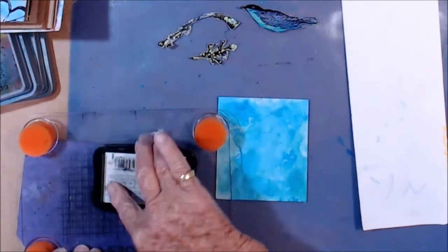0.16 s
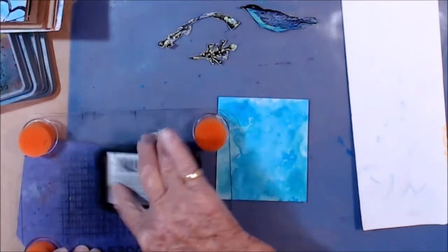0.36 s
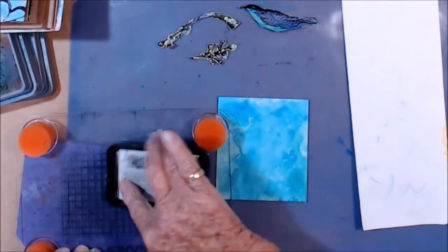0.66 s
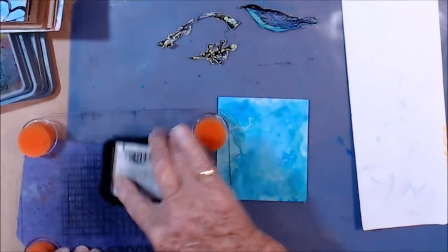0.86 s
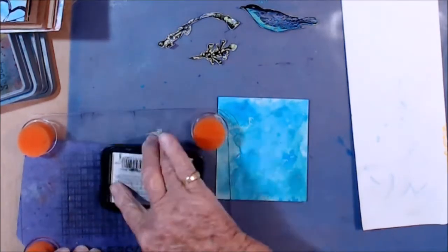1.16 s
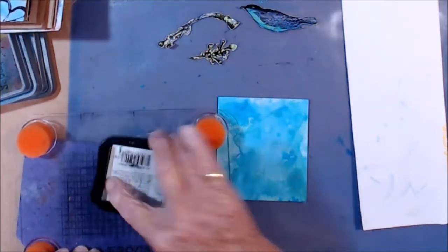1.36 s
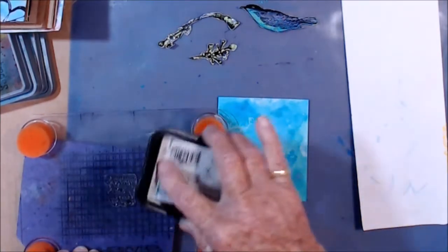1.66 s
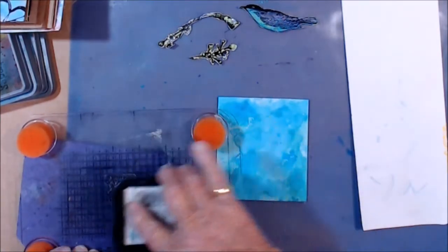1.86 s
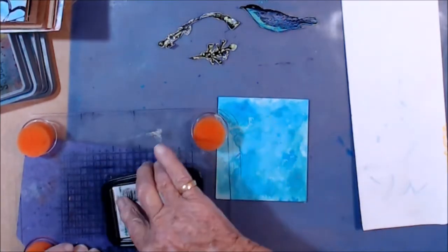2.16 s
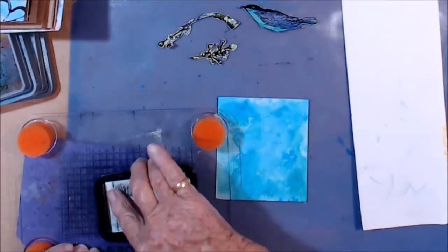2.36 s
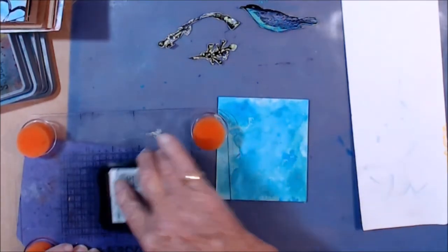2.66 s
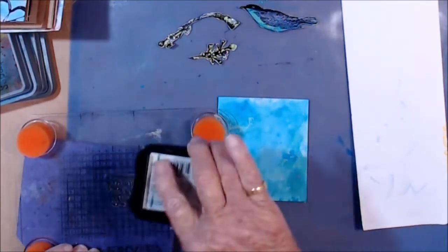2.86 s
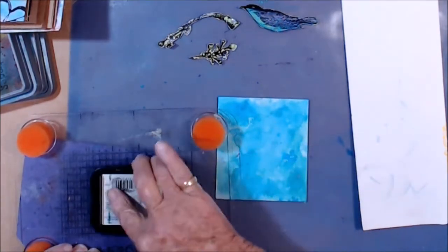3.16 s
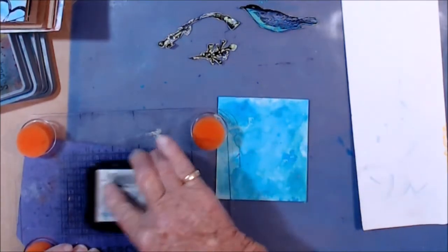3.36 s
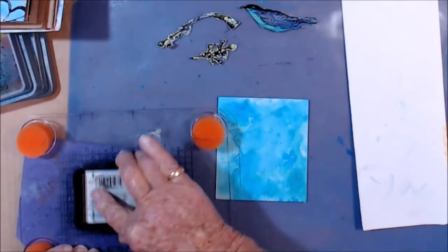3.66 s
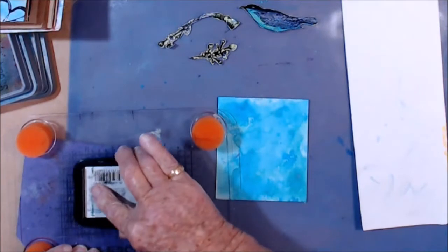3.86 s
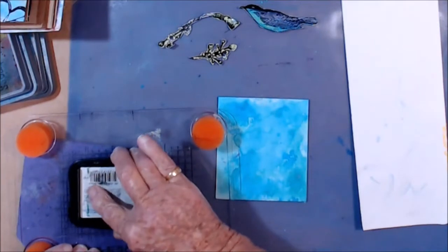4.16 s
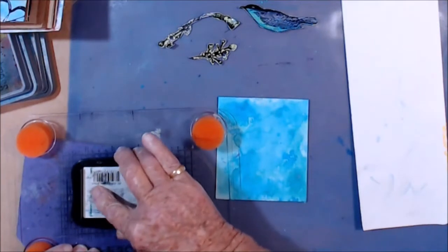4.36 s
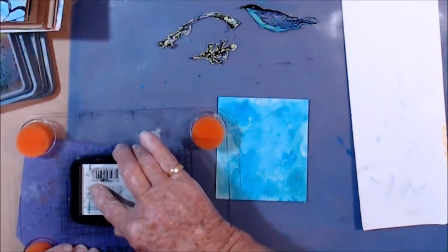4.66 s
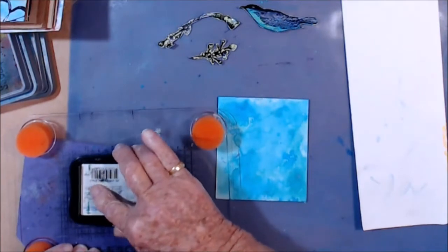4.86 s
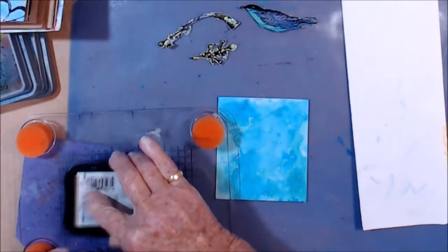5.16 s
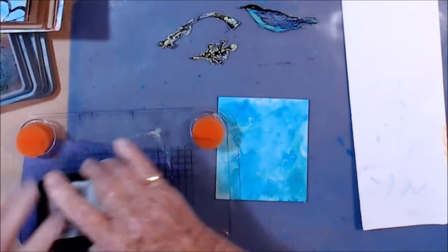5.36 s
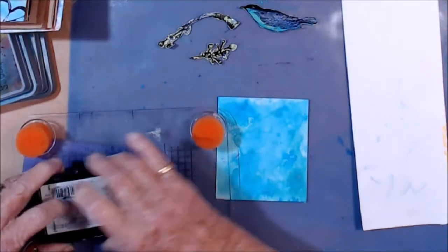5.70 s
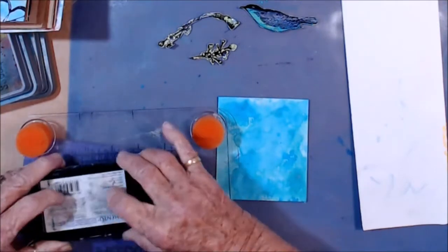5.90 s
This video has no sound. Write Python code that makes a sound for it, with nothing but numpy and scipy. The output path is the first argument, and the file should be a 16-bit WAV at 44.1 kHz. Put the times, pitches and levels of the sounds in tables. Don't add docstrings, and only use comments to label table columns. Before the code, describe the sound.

An ink pad is pressed repeatedly onto a rubber stamp, giving dull, thumping plastic taps on a table at an uneven pace indoors.

```python
import sys
import numpy as np
from scipy import signal
from scipy.io import wavfile
from scipy.ndimage import uniform_filter1d

SR = 44100
rng = np.random.default_rng(int(sys.argv[2]) if len(sys.argv) > 2 else 0)


def makeup_ratio(level_db):
    decades = np.asarray(level_db, float) / 20
    return 10 ** decades


def store_wav(level_fs):
    pcm = np.round(np.clip(np.atleast_2d(level_fs), -1, 1) * 32767)
    wavfile.write(sys.argv[1], SR, pcm.T.astype(np.int16))


N = 266011

# (deepest swing [s], table top [dB], legs [dB], stamp block [dB],
# pad lifts after [ms])
THUMPS = [(0.036, -21.5, -27, -36.5, 62), (0.369, -19.5, -27.5, -31.5, 39),
          (0.6456, -17.5, -30.5, -29.5, 45), (1.1082, -20, -27, -35, 56), (2, -30, -33.5, -48.5, 89),
          (2.283, -22, -30.5, -34, 49), (2.486, -34, -39, -56.5, 55), (3.1149, -18.5, -21, -23.5, 43),
          (3.4394, -21, -15.5, -17.5, 110), (3.71, -15, -20, -19, 110), (3.926, -19, -22, -23, 44),
          (4.28, -19.5, -22, -20.5, 110), (4.4612, -25, -42, -37.5, 47), (4.6403, -22, -37.5, -39.5, 50),
          (4.9652, -28.5, -32, -38, 49)]
# (time [s], table top [dB], legs [dB], stamp block [dB], block pitch [ratio])
NUDGES = [(0.3, -60, -55, -72, 0.81), (0.43, -51.5, -55, -46, 0.91), (1.27, -51, -51, -70, 0.61),
          (1.55, -62, -59, -82, .95), (2.02, -44, -59, -44.5, 0.99), (2.471, -55, -45, -64, 0.74),
          (2.818, -67, -60, -83, .91), (3.2, -40, -45, -40.5, .85), (3.33, -57, -50, -56, 0.76),
          (3.36, -60, -60, -59, .8), (3.535, -47, -34.5, -37, 0.76), (3.593, -51, -41, -37, 0.82),
          (3.625, -50, -52, -43, .9), (3.665, -53.5, -53, -47.5, 0.68), (3.787, -33, -55, -42, 0.72),
          (3.821, -49, -52.5, -44, 0.65), (4.005, -42, -52, -39, .68), (4.032, -50, -55, -45, .6),
          (4.051, -46, -54.5, -36, 0.76), (4.08, -54, -60, -46, .62), (4.14, -60, -61, -54, .7),
          (4.338, -38, -43, -36.5, 0.82), (4.632, -40, -29, -36.5, 0.93), (4.827, -70, -41, -87, 0.83),
          (4.9, -61, -43.5, -71, 0.83), (4.985, -34, -44, -54, 0.91), (5.134, -66, -48, -80, .9),
          (5.435, -61, -51, -67.5, 1), (5.641, -60.5, -71, -68, 0.91), (5.829, -74, -52.5, -82, 0.85),
          (5.925, -66, -50, -78, 0.89), (5.956, -64, -46, -78, .95), (6.016, -68, -46, -75, .95),
          (.55, -62, -50, -75, .7), (.215, -62, -54, -72, .6)]
# (frequency [Hz], likeness [0 to 1])
LIKENESS = [(30, 1), (300, 0.86), (1500, 0.12), (4000, 0.074), (12000, 0.12)]


def evened(x):
    return x / np.sqrt(np.mean(x ** 2) + 1e-20)


def read(points, hz):
    f, value = np.transpose(points)
    return np.interp(np.log(hz + 1), np.log(f + 1), value)


def add(mix, s, sound):
    part = mix[..., max(round(s * SR), 0):][..., :sound.shape[-1]]
    part += sound[..., :part.shape[-1]]


def ring(force, modes, pitch=1, hold=1):
    t = np.arange(SR // 9) / SR
    body = 0
    for hz, db, t60 in modes:
        body = body + makeup_ratio(db - 60 * t / (t60 * hold)) * np.sin(2 * np.pi * hz * pitch * t)
    out = signal.fftconvolve(force, body)
    return out / abs(out).max()


def noise(shape, patchy_db, size=1024):
    hop = size // 4
    hz = np.fft.rfftfreq(size, 1 / SR)
    a, b, c, d, patches = rng.standard_normal((N // hop + 5, len(hz), 5)).T
    patches = evened(uniform_filter1d(uniform_filter1d(patches, 8, 0), 8, 1))
    same = read(LIKENESS, hz)[:, None]
    left = a + 1j * b
    right = same * left + np.sqrt(1 - same ** 2) * (c + 1j * d)
    inside = (hz >= shape[0][0]) & (hz <= shape[-1][0])
    colour = makeup_ratio(read(shape, hz)[:, None] + patchy_db * patches) * inside[:, None]
    z = np.array([left, right]) * colour
    return evened(signal.istft(z, nperseg=size, noverlap=size - hop)[1][:, :N])


def shake(rest_db, share_db, fade_db):
    blows = np.zeros(N)
    for row in THUMPS + NUDGES:
        add(blows, row[0], makeup_ratio(np.array([row[3] + share_db])))
    fading = signal.lfilter([1], [1, -makeup_ratio(-fade_db / SR)], blows)
    return makeup_ratio(rest_db) + uniform_filter1d(fading, size=881)


def hands():
    # (time [s], grip
    # on the case [dB], sliding skin [dB])
    hand_moves = [(0, -98, -97.5), (.45, -86, -93), (.86, -88, -83), (1.05, -88, -89.5), (1.5, -85.5, -95),
                  (1.7, -103, -78), (1.95, -84, -87), (2.45, -79.5, -86), (2.9, -85, -98),
                  (3.5, -81.5, -90), (4.2, -92.5, -101), (4.72, -78, -79.5), (5.1, -77.5, -76.5),
                  (5.4, -76, -88), (5.58, -74, -77.5), (5.7, -72.5, -69), (6.03, -75, -81.5),
                  (2.23, -87, -87),
    ]
    # (frequency [Hz], level [dB per Hz])
    rumble = [(8.8, -48.5), (15, -1.5), (38, -5.5), (70, -1), (116, -13), (135, -25), (150, -19),
              (200, -63), (330, -120)]
    clatter = [(88, -42.5), (150, 10.5), (227, -2), (274, -12.5), (335, -22), (373, -20.5), (480, -24),
               (620, -46), (1060, -120)]
    handling = [(240, -37), (400, 1.5), (591, -4), (966, -8), (1290, -5.5), (1650, -11), (2500, -38),
                (3250, -59), (5500, -120)]
    rustle = [(880, -27.5), (1500, -4), (2340, -0.5), (2740, -5.5), (3140, -2), (4220, -4.5), (5040, -2.5),
              (6640, -12), (15800, -31.5)]
    hiss = [(88, -35), (150, 2.5), (236, -17.5), (304, -10), (477, -20), (548, -13.5), (3080, -29),
            (3970, -30), (6490, -32), (7740, -32.5), (8710, -45), (15100, -42), (16300, -45.5)]

    s, grip_db, slide_db = np.transpose(sorted(hand_moves))
    t = np.arange(N) / SR
    grip = makeup_ratio(np.interp(t, s, grip_db))
    slide = makeup_ratio(np.interp(t, s, slide_db))
    lumps = evened(uniform_filter1d(uniform_filter1d(rng.standard_normal(N), 500), 500))

    rumble_level = shake(rest_db=-63, share_db=-26, fade_db=210) + makeup_ratio(3.0) * grip
    clatter_level = shake(rest_db=-94, share_db=-12.5, fade_db=191) + makeup_ratio(-16.0) * grip
    case_level = shake(rest_db=-110, share_db=-40, fade_db=150) + grip
    skin_level = shake(rest_db=-110, share_db=-45.5, fade_db=152) + slide
    out = rumble_level * noise(rumble, patchy_db=4.0, size=4096)
    out += clatter_level * makeup_ratio(4.2 * lumps) * noise(clatter, patchy_db=5.0)
    out += case_level * makeup_ratio(0.5 * lumps) * noise(handling, patchy_db=-3.0)
    out += skin_level * noise(rustle, patchy_db=2.0, size=256)

    pulses = np.exp(2.9 * (np.cos(2 * np.pi * 29.97 * (t - .003)) - 1))
    whine = makeup_ratio(-90.5) * pulses * np.sin(2 * np.pi * 8000 * t)
    return out + makeup_ratio(-75.0) * noise(hiss, patchy_db=1.5) + whine


def drags():
    # (time [s], level [dB], lowest hollow [Hz], length [ms])
    strokes = [(0.861, -79.5, 530, 170), (1.36, -77, 400, 73), (1.63, -73, 476, 60), (1.782, -79, 470, 91),
               (3.5, -59, 413, 61), (3.57, -62.5, 405, 116), (3.765, -63, 450, 49), (3.99, -60.5, 427, 46),
               (4.035, -64, 439, 65), (4.11, -75.5, 430, 57), (4.3, -66.5, 520, 52), (1.139, -72, 458, 81),
               (0.4, -70, 542, 81), (0.329, -79, 417, 32), (3.17, -62, 428, 75), (4.66, -73, 657, 51),
               (5.119, -74.5, 504, 67), (5.32, -76, 577, 100), (5.399, -81, 1303, 98),
               (5.599, -75.5, 1050, 180), (5.381, -75.5, 515, 97), (5.469, -76.5, 578, 97),
               (5.558, -86, 420, 110), (5.629, -73.5, 542, 140), (5.739, -82, 530, 150),
               (5.819, -81.5, 456, 127)]
    # (pitch over the lowest [ratio], level [dB], width [Hz])
    hollows = [(0.983, 6, 115), (1.5, -2.5, 68), (2.4, -5.5, 100), (2.45, -7.5, 120)]
    out = np.zeros(N)
    ages = np.arange(2000) / SR
    for s, db, hz, length_ms in strokes:
        t = np.arange(round(length_ms * SR / 1000)) / SR
        body = 0
        for ratio, hollow_db, width in hollows:
            swell = ages * np.exp(-np.pi * width * ages)
            tone = np.sin(2 * np.pi * hz * ratio * ages)
            body = body + makeup_ratio(hollow_db) * width ** 1.7 * swell * tone
        friction = np.sin(np.pi * (t / t[-1]) ** 0.5) * rng.standard_normal(len(t))
        add(out, s, makeup_ratio(db) * evened(signal.fftconvolve(friction, body)))
    return out


def ticks():
    # (time [s], level [dB], brightest tone [Hz], ring to -60 dB [s])
    clicks = [(1.485, -53, 4030, 0.014), (3.1026, -29.5, 1936, 0.061), (3.43, -27, 2350, 0.007),
              (3.695, -20.5, 3740, 0.016), (4.2712, -29.5, 2500, 0.0067), (5.1125, -34, 2930, 0.0076),
              (5.2058, -25.5, 3040, 0.028), (5.2054, -32, 5100, 0.012), (5.2068, -55, 11000, .008),
              (6.2, -43, 5500, .008), (3.6953, -35, 11600, .012), (3.279, -34, 3740, 0.011),
              (6.1, -39.5, 5080, 0.026), (6.0054, -35, 3600, 0.032)]
    # (time [s], level [dB], length [ms])
    shivers = [
        (0.4544, -76, 26),
        (1.205, -80, 16.0),
        (2.3283, -78, 13),
        (2.381, -70.5, 19),
        (2.536, -79, 25),
        (3.17, -76, 20),
        (3.212, -77, 14),
        (3.4984, -68, 6.5),
        (3.54, -71, 6),
        (4.019, -74, 16.0),
    ]
    # (frequency [Hz], level [dB], ring to -60 dB [s])
    jar = [(4540, -3.5, 0.024), (5900, -11, 0.024)]
    out, t = np.zeros(N), np.arange(3000) / SR
    for s, db, hz, t60 in clicks:
        spread = 1.3 ** np.arange(-1, 5)
        modes = [(hz * r, -25 * abs(np.log(r)), t60 / r) for r in spread]
        add(out, s, makeup_ratio(db - 11.5) * ring(np.array([1., -1.]), modes))
    for s, db, length_ms in shivers:
        chatter = rng.standard_normal(3000) ** 3 * np.exp(-t * 1000 / length_ms)
        add(out, s, makeup_ratio(db + 5.0) * ring(chatter, jar))
    return out


def felt():
    # (time [s], level [dB], brightest tone [Hz], length [ms])
    peels = [(0.173, -62.5, 2760, 28), (0.516, -61.5, 2200, 18), (0.767, -65.5, 3950, 15),
             (1.245, -61.5, 3020, 12), (1.3893, -66, 4220, 13), (2.3835, -67.5, 4330, 37),
             (2.421, -70, 3950, 14), (2.596, -63.5, 4100, 17), (3.2752, -46.5, 3540, 20.4),
             (3.581, -57, 3050, 8.3), (3.612, -50.5, 3020, 17), (3.841, -46, 3020, 11.3),
             (3.9938, -59.5, 3020, 34), (4.1812, -63.5, 4000, 21), (4.372, -48.5, 2940, 14),
             (4.534, -64, 3910, 26), (4.722, -56, 3860, 12), (4.867, -58, 3100, 24),
             (5.0996, -43, 2980, 25.4), (5.131, -67, 2570, 200), (5.165, -67, 3960, 50),
             (5.212, -57, 4900, 41), (5.2486, -56.5, 2325, 7.7), (5.6, -58, 4850, 27),
             (5.65, -79, 2300, 76), (5.699, -60.5, 3140, 38), (5.82, -65, 3000, 46),
             (5.725, -62.5, 5070, 37), (5.9509, -61, 2310, 49), (6.0043, -54.5, 4330, 38)]
    # (frequency [Hz], level [dB per Hz])
    fibre_colour = [(410, -54.5), (700, -24.5), (946, -26.5), (1230, -2), (2530, -8), (3740, 0.5),
                    (6740, -14), (8650, -29.5), (16000, -29.5)]
    # (pitch over the brightest [ratio], level [dB], ring to -60 dB [s])
    spots = [(1, 0, .016), (1.22, -6, .012), (1.5, -7, .012), (1.97, -7, .012), (.75, -8, .014),
             (.42, -8, .02)]
    soft_db, crisp_db = -77, -58
    out, t = np.zeros((2, N)), np.arange(5000) / SR
    crackle = noise(fibre_colour, patchy_db=3.0, size=256)
    for s, db, hz, length_ms in peels:
        u = t / (length_ms / 1000)
        swell = (1 - np.exp(-u / 0.4)) * np.exp(-1.5 * u ** 1.1)
        modes = [(hz * ratio, spot_db, t60) for ratio, spot_db, t60 in spots]
        snaps = ring(rng.standard_normal(5000) ** 5 * swell, modes)
        fizz = crackle[:, round(s * SR):][:, :len(t)]
        n = fizz.shape[1]
        grit = 0.18 * np.clip((db - soft_db) / (crisp_db - soft_db), .1, 1)
        add(out, s - .002, makeup_ratio(db) * (fizz * swell[:n] * (1 - grit) + 5.0 * grit * snaps[:n]))
    return out


def contacts_of_case():
    # (time [s], level [dB], shell pitch [Hz], rim against shell [dB], base against shell [dB])
    claps = [(0.0268, -54, 1140, -11, -5), (0.0448, -48.5, 1110, -16, -4.5),
             (0.351, -47.5, 1200, -12.5, -17.5), (0.3609, -42.5, 1203, -7, -5.5),
             (0.3783, -44, 1200, -10, -10), (0.6335, -55, 1460, -3.5, -15), (0.6544, -54, 1294, -21, -3),
             (1.0895, -59, 1290, -18, -3.5), (1.0971, -48, 1110, -15, -4.5), (1.117, -51, 1280, -20, -10),
             (1.9797, -63.5, 1280, -13, -10), (2.0165, -53, 1150, -12, -22),
             (2.2648, -51, 1186, -11.5, -24), (2.2728, -51.5, 1380, -17.5, -12),
             (2.2922, -44, 1290, -29, -12), (3.0959, -34, 1240, -17, -4), (3.1043, -43, 1174, -9, -22),
             (3.122, -33.5, 1148, -22, -7.5), (3.4216, -42.5, 1260, -12.5, -5),
             (3.4296, -35.5, 1218, -12.5, -6), (3.4432, -30, 1142, -21.5, -11),
             (3.694, -18, 1243, -18, -6.5), (3.9083, -47.5, 1253, 1, -3), (3.9185, -43, 1170, 2, 3.5),
             (3.9314, -41, 1076, -23, -12), (3.9358, -40, 1107, -16, -3), (4.2634, -47, 1180, -0.5, 0.5),
             (4.2702, -38, 1240, -5.5, -1.5), (4.285, -40, 1285, -19, -7), (4.6138, -57, 1140, -13, 5.5),
             (4.6407, -49, 1120, -18.5, -11.5), (4.9526, -50.5, 1070, -17, -9)]
    # (pitch over the main tone [ratio], level [dB], ring to -60 dB [s])
    shell_modes = [(.76, -14, .04), (.85, -9, .055), (.93, -13, .05), (1.0, 0, .03), (1.06, -15, .04),
                   (1.18, -12, .035), (1.31, -17, .02), (1.46, -22, .02)]
    # (frequency [Hz], level [dB], ring to -60 dB [s])
    rim_modes = [(2040, -5.5, .025), (2100, -3.5, .025), (2280, 0.5, .035), (2560, -8, 0.013),
                 (3050, -7.5, 0.024), (3780, -2, 0.03)]
    under_modes = [(378.7, 5.5, .07), (450, -7.5, 0.071), (549, -4.5, 0.063), (636.4, 4, 0.075),
                   (733, -8.5, 0.052), (810, -14.5, .06)]
    out, t = np.zeros(N), np.arange(SR // 14) / SR
    rim = ring(np.hanning(7), rim_modes)[:len(t)]
    under = ring(np.hanning(25), under_modes)[:len(t)]
    for s, db, hz, rim_db, base_db in claps:
        shell = 0
        for ratio, mode_db, t60 in shell_modes:
            shell = shell + makeup_ratio(mode_db - 60 * t / t60) * np.sin(2 * np.pi * hz * ratio * t)
        shell = shell * (1 - np.exp(-t / 0.00093))
        clap = shell / abs(shell).max() + makeup_ratio(rim_db + 6.5) * rim + makeup_ratio(base_db + 5.5) * under
        add(out, s, -makeup_ratio(db - 1.0) * clap)
    return out


def case():
    # (time [s], case [dB], air puff [dB], base [dB], spread [ms])
    slaps = [(0.0235, -48, -46, -64.5, 9.8), (0.045, -52, -43, -52.5, 5.8),
             (0.3563, -43.5, -44.5, -79, 8.5), (0.636, -47, -41.5, -50, 4.8), (1.092, -43, -49, -63, 10.5),
             (1.101, -51, -38, -41, 8.1), (1.986, -59, -55, -77, 14.7), (2.2717, -47.5, -44, -53.5, 9.1),
             (3.098, -32, -36.5, -36, 8.5), (3.425, -51, -32.5, -37.5, 10),
             (3.6965, -24.5, -29.5, -28, 5.8), (3.9095, -37, -38.5, -36, 10.9),
             (4.266, -36.5, -36.5, -32, 8), (4.6145, -46.5, -45.5, -51.5, 14.5),
             (4.9519, -52, -63, -63, 8.9)]
    # (time [s], case [dB], base [dB], case pitch [ratio])
    settles = [(0.3744, -44, -44, 1.05), (0.6549, -42, -57, 0.71), (1.6374, -64, -59, 1.2),
               (2.0114, -48, -65, 1.08), (2.2922, -49.5, -53, 0.7), (3.1218, -39, -37, 1.03),
               (3.4296, -34.5, -35, 1.04), (3.4431, -38, -51, 1.0), (3.5199, -61, -47.5, 0.59),
               (3.5783, -71.5, -43.5, 0.53), (4.003, -70, -53, 0.79), (4.0512, -60, -61, 0.7),
               (4.2892, -42, -49, 0.98), (5.2494, -78, -58, 1.2)]
    # (time [s], level [dB], pitch [ratio])
    knocks = [
        (1.635, -72, 1.3),
        (3.103, -35, 1.07),
        (3.425, -26.5, 0.93),
        (3.911, -31.5, 1.01),
        (4.264, -23, 0.951),
        (5.25, -54.5, 1.27),
    ]
    # (frequency [Hz], level [dB], ring to -60 dB [s])
    case_modes = [(950, -14.5, 0.095), (1150, -1.5, 0.074), (1196, 4.5, 0.017), (1260, -10, 0.02),
                  (1520, -6.5, 0.025), (1760, -13, 0.03), (1900, -17.5, 0.011), (2200, -7.5, 0.039),
                  (3020, -5.5, 0.032), (3580, -17.5, 0.051)]
    base_modes = [(447, -2.5, 0.057), (542, -10.5, 0.077), (671, 0, 0.081), (746, 0, 0.08),
                  (792.5, 0, 0.058), (880, -14, 0.033)]
    dull_modes = [(328, 5, 0.077), (400, -17, 0.057), (620, -2.5, 0.053)]
    # (frequency [Hz], level [dB per Hz])
    air_colour = [(880, -43), (1500, -5.5), (2660, -13.5), (4040, -14), (4920, -21.5), (5220, -18.5),
                  (8570, -29.5), (11700, -33), (16000, -42.5)]

    out, puffs, t = np.zeros(N), np.zeros(N), np.arange(5000) / SR
    rows = [(*row, 1.01 + .005 * max(row[1] + 35, 0)) for row in slaps]
    rows += [(s, db, db - 27, base_db, 5.26, pitch) for s, db, base_db, pitch in settles]
    for s, case_db, puff_db, base_db, spread_ms, pitch in rows:
        hits = rng.standard_normal(5000)
        u = t / (spread_ms / 1000)
        contacts = hits ** 3 * (1 - np.exp(-u / 0.82)) * np.exp(-u / 1.28)
        gripped = [(hz * (1 + .03 * h), db, t60) for (hz, db, t60), h in zip(case_modes, hits[::-1])]
        add(out, s - .002, makeup_ratio(case_db - 4.5) * ring(contacts, gripped, pitch=pitch))
        add(out, s - .002, makeup_ratio(base_db - 2.5) * ring(contacts, base_modes, pitch=1 + .03 * hits[0]))
        add(puffs, s - .003, makeup_ratio(puff_db - 8.5) * (1 - np.exp(-u / 0.49)) * np.exp(-u / 1.73))
    out += contacts_of_case()
    for s, db, pitch in knocks:
        add(out, s, -makeup_ratio(db) * ring(np.hanning(SR // 1000), dull_modes, pitch=pitch))
    return out, puffs * noise(air_colour, patchy_db=7.5, size=256)


def swing(modes, u, rise, crest, lead, hold):
    age = np.maximum(u - crest, 0)
    out = 0
    for k, (hz, db, t60) in enumerate(modes):
        out = out - makeup_ratio(db - 60 * age / (t60 * hold)) * np.cos(2 * np.pi * hz * u + lead * k)
    out = out * np.sin(np.pi / 2 * np.clip(1 + (u - crest) / rise, 0, 1)) ** 2
    return out / abs(out).max()


def table():
    # (frequency [Hz], level [dB], ring to -60 dB [s])
    top_modes = [(89, -21, 0.08), (107.8, 24, 0.17), (132, -2, 0.38), (137, -22.5, 0.13)]
    leg_modes = [(58.6, 9, 0.18), (80, -2, 0.26)]
    block_modes = [(194.3, -9, 0.16), (224.4, -6, 0.15), (265, -2.5, 0.15), (283.3, 5.5, 0.093),
                   (340.7, -10.5, 0.11), (386, -7.5, 0.041)]
    block_pitch = [0.923, .97, 0.95, 0.94, 0.917, 0.94, 0.92, .94, 0.94, 1, 0.97, 0.95, 0.92, 0.9, 0.92]

    out, u = np.zeros(N), np.arange(-SR // 40, SR // 4) / SR
    rows = []
    for (s, top_db, leg_db, block_db, lift_ms), pitch in zip(THUMPS, block_pitch):
        hold = 1.105 + 0.09 * max(-24.5 - top_db, 0)
        rows.append((s, top_db, leg_db, block_db, pitch, lift_ms, hold))
    rows += [(*row, 43, 1.3) for row in NUDGES]
    for s, top_db, leg_db, block_db, pitch, lift_ms, hold in rows:
        lifted = 1 / (1 + np.exp(-(u * 1000 - lift_ms) / 3))
        top = swing(top_modes, u, rise=0.019, crest=0.0054, lead=0.49, hold=hold) * makeup_ratio(-11 * lifted)
        legs = swing(leg_modes, u, rise=0.014, crest=0.00057, lead=0.17, hold=hold)
        late = (u - .0022) * pitch
        block = swing(block_modes, late, rise=0.02, crest=-0.00036, lead=0.66, hold=hold)
        add(out, s + u[0], makeup_ratio(top_db) * top + makeup_ratio(leg_db) * legs + makeup_ratio(block_db) * block)
    return out


def room(x):
    # (frequency [Hz], ring to -60 dB [s])
    room_decay = [(60, 0.17), (250, 0.31), (1000, 0.15), (4000, 0.11), (12000, 0.052)]
    taps = np.zeros((2, SR // 2))
    at = np.arange(200, SR // 2 - 20, 20)
    at = at + rng.integers(0, 20, (2, len(at)))
    np.put_along_axis(taps, at, rng.choice([-1., 1.], at.shape), 1)
    hz, t, z = signal.stft(taps, SR, nperseg=256)
    same = read(LIKENESS, hz)[:, None]
    z[1] = same * z[0] + np.sqrt(1 - same ** 2) * z[1]
    fade = makeup_ratio(-60 * t / read(room_decay, hz)[:, None])
    tail = signal.istft(z * fade, SR, nperseg=256)[1]
    return signal.fftconvolve(x, tail / np.linalg.norm(tail[0]), axes=1)[:, :N]


def scene():
    slaps, puffs = case()
    solid = slaps + table()
    airborne = puffs + felt() + ticks()
    near = np.array([solid, np.roll(solid, 2)]) + airborne
    mix = near + makeup_ratio(-9.5) * room(slaps + airborne) + hands() + drags()
    return mix * makeup_ratio([[.9], [-1.1]])


def band_limit(x):
    return signal.sosfilt(signal.butter(12, 16470, fs=SR, output="sos"), x)


def record(dry):
    images_db = [-52, -59, -61.5, -63]
    # (time [s], level [dB])
    short_click = [
        (0.3899, -44),
    ]
    t = np.arange(N) / SR
    comb = np.zeros(N)
    for k, db in enumerate(images_db):
        comb += makeup_ratio(db) * np.cos(2 * np.pi * (k + 1) * 3900 * t)
    x = dry * (1 + 2 * comb)
    for s, db in short_click:
        add(x, s, makeup_ratio(db + 8.0) * np.array([1., -.3]))
    low_pass = signal.firwin(511, 15780, window=("kaiser", 7), fs=SR)
    x = signal.oaconvolve(x, low_pass[None], "same")
    return band_limit(x)


dry = scene()
out = record(dry)
store_wav(out)
```